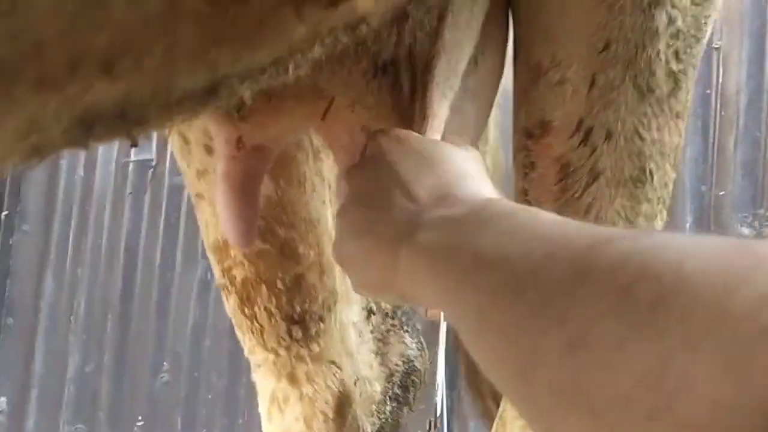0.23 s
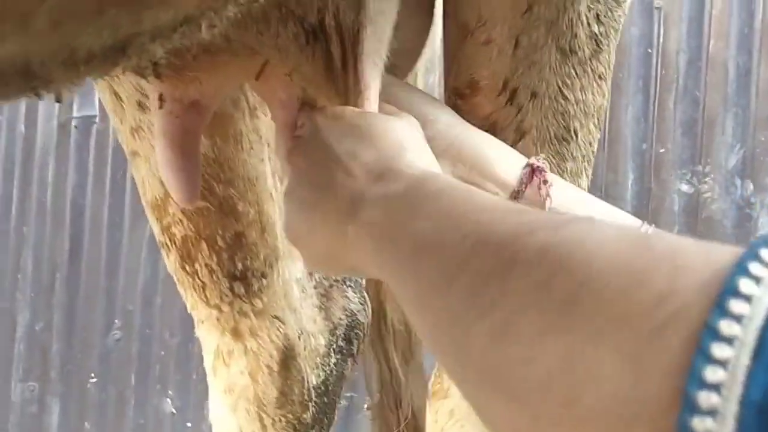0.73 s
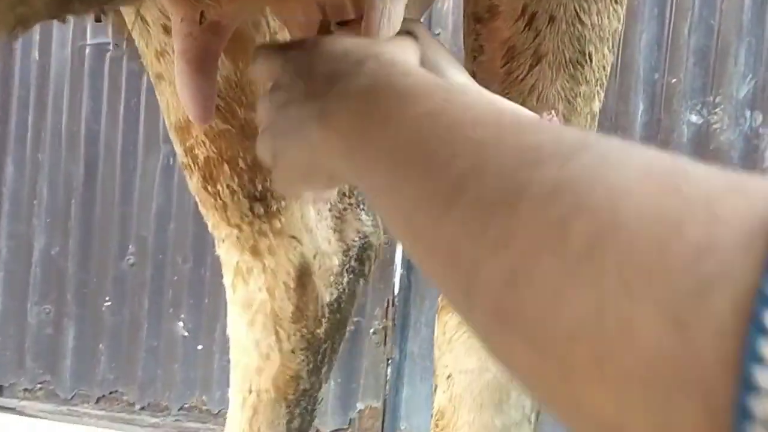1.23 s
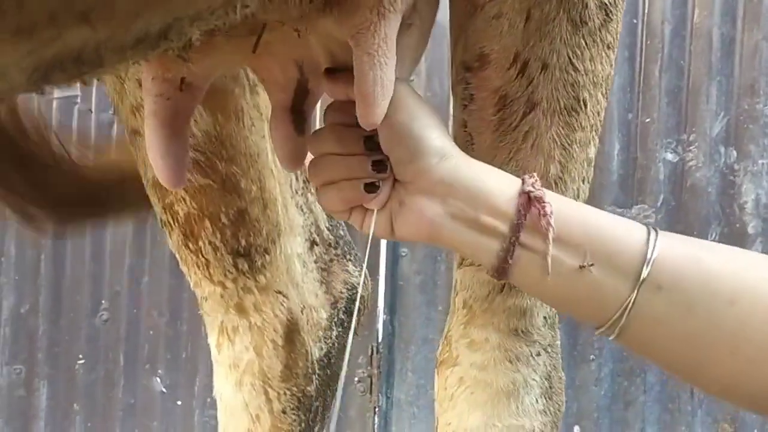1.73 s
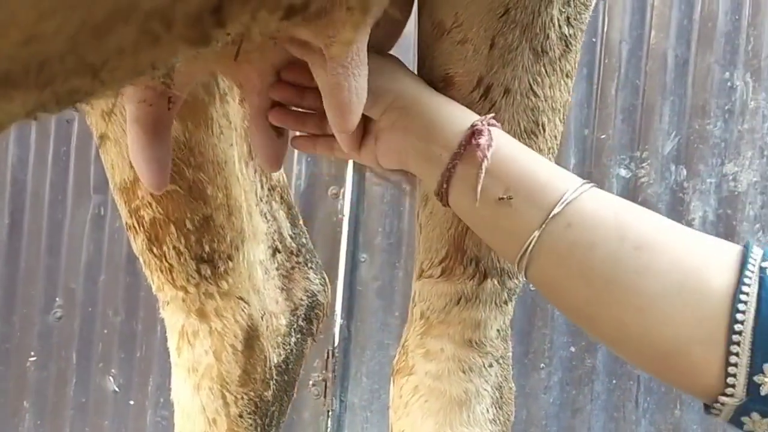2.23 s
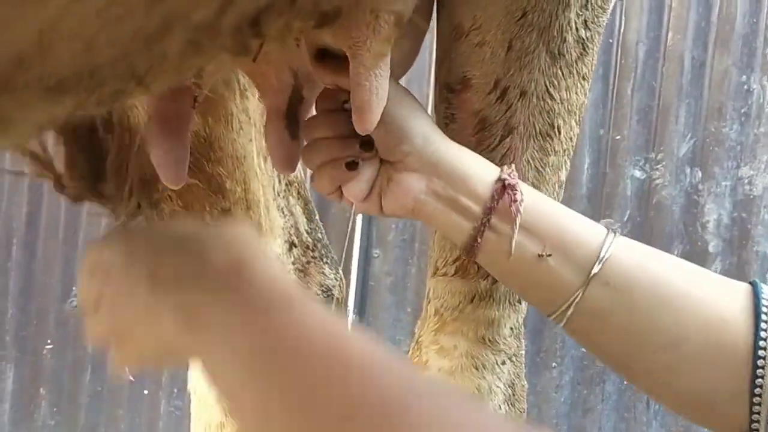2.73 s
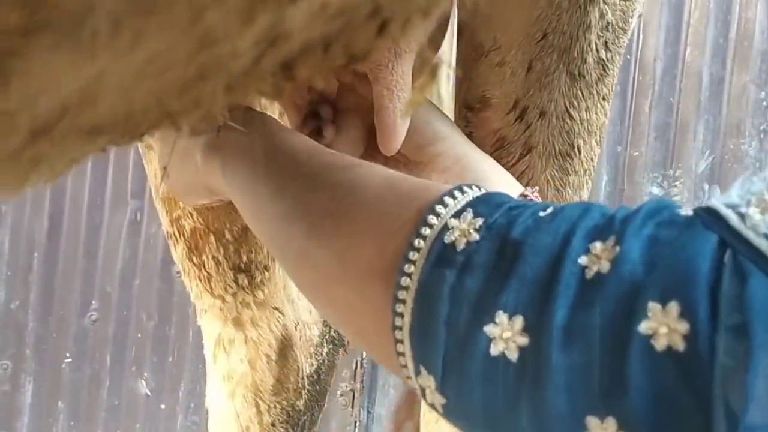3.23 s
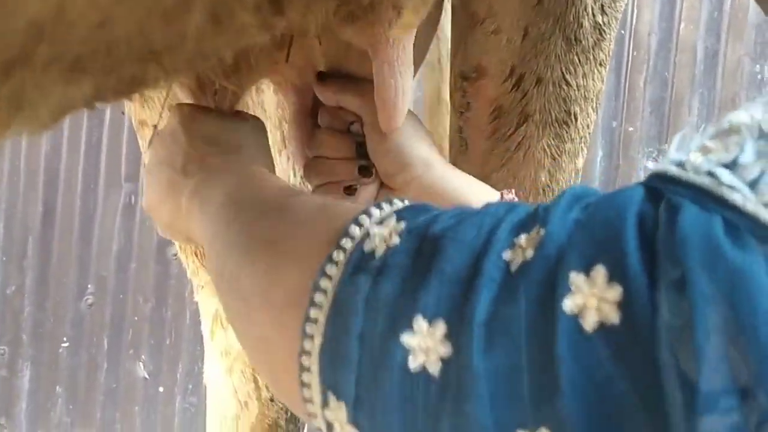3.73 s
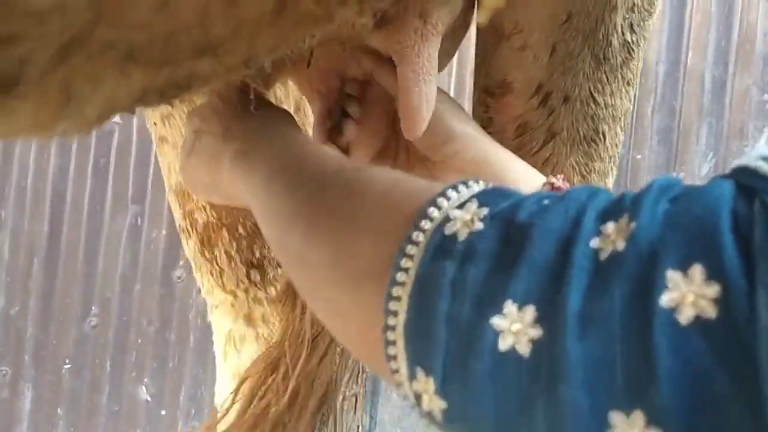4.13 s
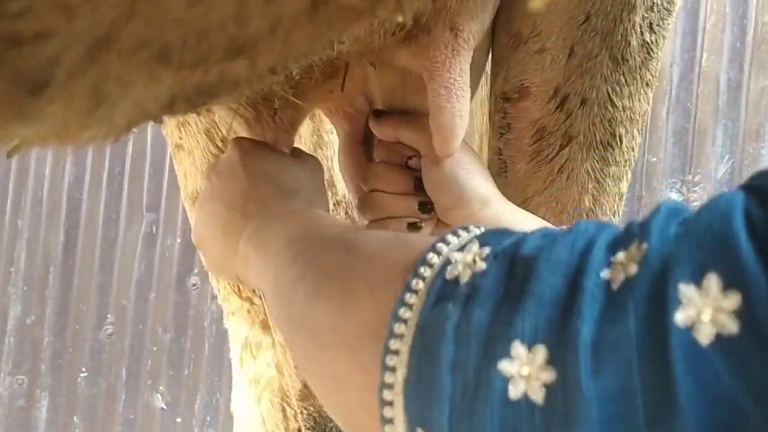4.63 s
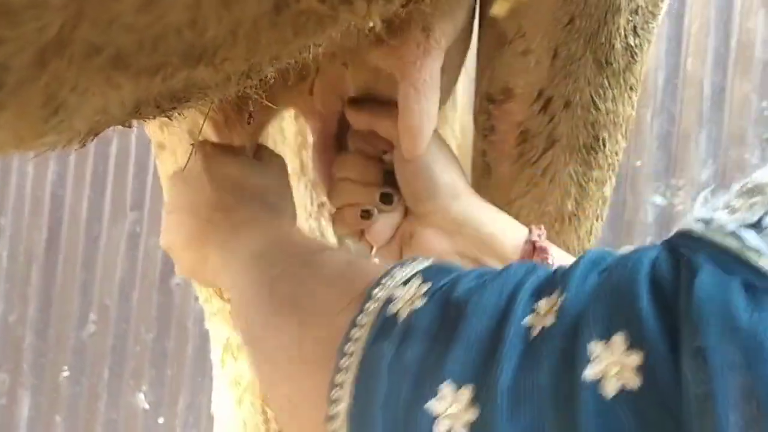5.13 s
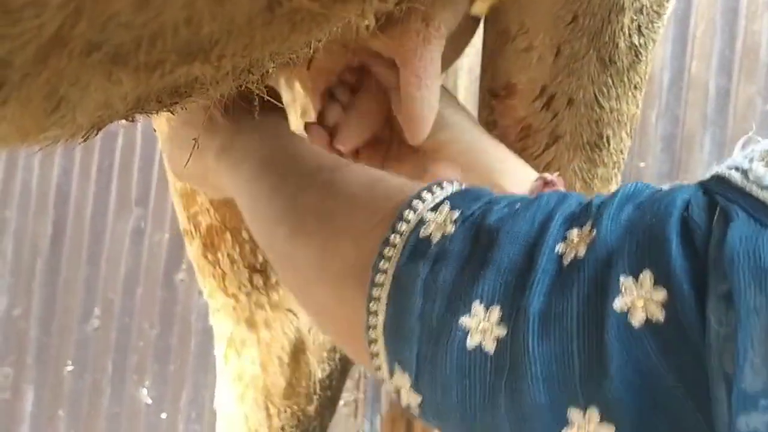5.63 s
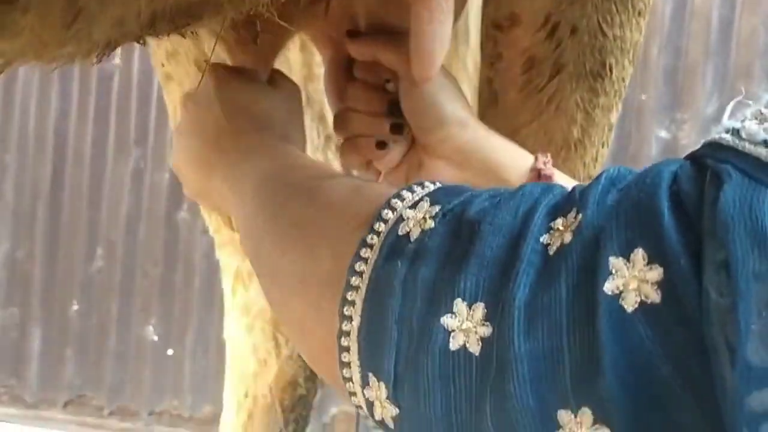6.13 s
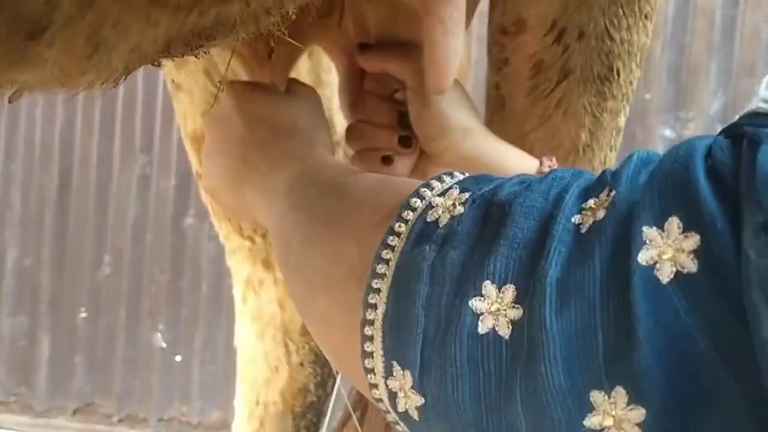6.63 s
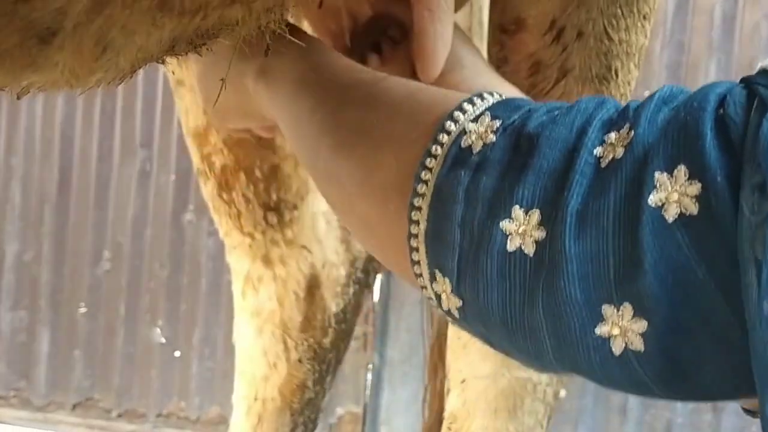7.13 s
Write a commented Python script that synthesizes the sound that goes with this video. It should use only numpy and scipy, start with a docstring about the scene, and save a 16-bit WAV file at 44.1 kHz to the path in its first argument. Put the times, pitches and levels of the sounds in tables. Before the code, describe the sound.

Hand milking heard very near in a small tin-walled shed: fizzing spray, pattering drops and plopping bubbles in each spurt. Rustling cloth and tiny high bangle tinks accompany the first jets. A hard, ringing squirt comes just before the middle, then a grip change and dull ground thuds. Slower, rounder spurts with hollow gulps follow, over faint still air and low rumble, ending on a very weak trickle of spray.

```python
"""Hand milking into a bucket.

A cow is milked by hand, close by, in a quiet tin-walled shed. Each squeeze sends a jet into frothy milk:
random drop impacts and bubbles patter, fizzing noise makes the spray, low resonances make the hollow gulp.
Filtered noise makes the rustle of hands and sleeves, the spits, the thuds on the ground and the still air.
Beating sine pairs make thin bangles tink."""
import sys
import numpy as np
from scipy import signal
from scipy.fft import rfft, irfft
from scipy.io import wavfile
from scipy.ndimage import uniform_filter1d

SR = 44100
rng = np.random.default_rng(int(sys.argv[2]) if len(sys.argv) > 2 else 0)


def pcm_store(signal):
    """Save signal as 16-bit PCM."""
    levels = np.round(np.clip(np.atleast_2d(signal), -1, 1) * 32767)
    wavfile.write(sys.argv[1], SR, levels.astype(np.int16).T)


N = 326340
TIME = np.arange(N) / SR
AGE = np.arange(SR // 4) / SR  # time within one event [s]

# splash and spray colours per kind of jet: (frequency [Hz], level [dB])
BRIGHT_SPLASH = [(280, -59), (480, -5), (752, -15.5), (859, -15.5), (1090, -1), (1200, -26), (1280, -6),
                 (2070, 5.5), (2860, -2.5), (3070, -5), (3580, -5), (4090, -14), (5500, -11), (7150, -85),
                 (12100, -120)]
BRIGHT_SPRAY = [(2240, -37), (3800, -8), (5690, -14), (7820, -2), (9770, -5), (12400, 3.5), (14900, 0),
                (16000, -37)]
HARD_SPLASH = [(280, -44), (480, -31), (565, -16), (613, -34), (894, -11.5), (971, -9), (1090, 4.5),
               (1210, -8), (1850, -2), (2070, -2.5), (2640, 0), (3510, -21.5), (3810, -4.5), (4130, -48),
               (5500, -46), (7150, -66), (12100, -120)]
HARD_SPRAY = [(2470, -27), (4200, -9), (5650, -12.5), (5940, -9), (6350, -4), (6610, -15), (7860, 0.5),
              (9350, -14), (13200, -4.5), (15000, -7), (16000, -21)]
DEEP_SPLASH = [(480, 10.5), (560, -12), (690, -7), (810, -10.5), (1020, -1.5), (1360, -7), (1550, -16),
               (1850, -8.5), (2700, -9.5), (3450, -3.5), (3950, -10), (5500, -19.5)]
DEEP_SPRAY = [(2240, -37), (3800, -18), (5230, -18), (6930, -4), (9540, -7), (13800, 4), (16000, 0)]
FULL_SPLASH = [(480, -2), (560, -10.5), (780, -8), (1020, 3.5), (1200, -3.5), (1400, -3.5), (1900, -3.5),
               (2550, -1), (3400, 4.5), (3900, -3.5), (4400, -32), (5500, -9.5)]
FULL_SPRAY = [(2470, -5), (4200, -3.5), (4890, -18), (6720, -1), (8740, -11), (10200, -6), (12000, 0),
              (15000, -5), (16000, 5)]
THIN_SPLASH = [(410, -40), (700, -14), (1150, -6), (2190, -8), (2590, -1), (4800, -10), (6830, -6),
               (9600, -25), (14000, -17), (16000, -31)]
# squeezes: (start [s], build-up [s], length [s], splash [dB], gulp [dB], spray [dB], kind of jet)
SQUIRTS = [ (0.198, 0.036, 0.22, -41.5, -47.5, -43.5, "bright"),
           (0.842, 0.025, 0.039, -46.5, -65, -42, "bright"),
           (1.008, 0.03, 0.17, -41.5, -45.5, -43.5, "bright"),
           (1.553, 0.17, 0.22, -38.5, -48.5, -42.5, "bright"),
           (2.307, 0.043, 0.088, -41.5, -72, -46, "bright"), (2.605, 0.11, 0.4, -29.5, -41, -45.5, "hard"),
           (3.398, 0.023, 0.072, -55, -61, -47, "bright"), (4.35, 0.085, 0.32, -39.5, -45, -48.5, "deep"),
           (5.064, 0.11, 0.31, -44.5, -45, -49, "full"), (5.781, 0.12, 0.305, -43.5, -51, -50, "full"),
           (6.437, 0.065, 0.36, -42, -45, -49, "full"), (7.189, 0.078, 0.3, -56, -69, -66.5, "thin"), ]
DRUM_HZ = 105  # lowest mode of the bucket's bottom


def squirts():
    """All squeezes; the hard jet also drums the bottom of the bucket."""
    milk = liquid()
    bright = jet(milk, "bright", BRIGHT_SPLASH, BRIGHT_SPRAY, bubbles_db=-7, ring_db=-26)
    hard = jet(milk, "hard", HARD_SPLASH, HARD_SPRAY, bubbles_db=-10, ring_db=-1)
    deep = jet(milk, "deep", DEEP_SPLASH, DEEP_SPRAY, bubbles_db=-5.5, ring_db=2.5)
    full = jet(milk, "full", FULL_SPLASH, FULL_SPRAY, bubbles_db=-12.5, ring_db=-10)
    thin = jet(milk, "thin", THIN_SPLASH, FULL_SPRAY, bubbles_db=-13, ring_db=-21)

    hits = drops(rate=400, spread_db=3)
    drum = even(resonate(resonate(hits, DRUM_HZ, 22), DRUM_HZ, 45), span_s=0.06)
    drumming = np.zeros(N)
    for start, build, length, _, gulp_db, _, kind in SQUIRTS:
        if kind == "hard":
            drumming += undb(gulp_db) * envelope(start, build, length, rise_db=14, sag_db_per_s=48, release=0.2)
    return bright + hard + deep + full + thin + undb(0.5) * drum * drumming


# air resonances of the bucket: (frequency [Hz], width [Hz], level [dB])
BUCKET = [(985, 33, 3.5), (1404, 81, 11), (1660, 110, 9), (1920, 120, 4), (3200, 250, -33)]


def jet(textures, kind, splash_colour, spray_colour, bubbles_db, ring_db):
    """Drops patter, ring the bucket, shake the hollow and throw spray; all but the hard jet sputter."""
    patter, bubbles, gulp, mist = textures
    splash_gain, gulp_gain, spray_gain = squeezes(kind)
    patter = patter + undb(bubbles_db) * bubbles
    ring = sum(undb(db) * resonate(patter, hz, width) for hz, width, db in BUCKET)
    splash = even(colour(patter + undb(ring_db) * ring, splash_colour), span_s=0.022)
    spray = even(colour(mist, spray_colour), span_s=0.03)
    strength = 1 if kind == "hard" else sputter()
    return strength * (splash_gain * splash + gulp_gain * gulp) + spray_gain * spray


# splash builds with the squeeze and sags as the teat empties
SPLASH_RISE_DB, SPLASH_SAG_DB_PER_S, SPLASH_RELEASE_S = 7.5, 14, 0.23
# the hollow reaches its level DIG_S after the splash, once the jet has dug it
DIG_S, GULP_RISE_DB, GULP_SAG_DB_PER_S, GULP_RELEASE_S = 0.04, 12, 8, 0.15
# spray flies as soon as the teat opens
SPRAY_ATTACK_S, SPRAY_SAG_DB_PER_S, SPRAY_RELEASE_S = 0.013, 2.5, 0.16


def squeezes(kind):
    """Gain curves of splash, hollow and spray for all squeezes with one kind of jet."""
    splash, gulp, spray = np.zeros((3, N))
    for start, build, length, splash_db, gulp_db, spray_db, row_kind in SQUIRTS:
        if row_kind != kind:
            continue
        splash += undb(splash_db) * envelope(start, build, length, SPLASH_RISE_DB,
                                             SPLASH_SAG_DB_PER_S, SPLASH_RELEASE_S)
        gulp += undb(gulp_db) * envelope(start, build + DIG_S, length, GULP_RISE_DB,
                                         GULP_SAG_DB_PER_S, GULP_RELEASE_S)
        spray += undb(spray_db) * envelope(start, SPRAY_ATTACK_S, length, 0,
                                           SPRAY_SAG_DB_PER_S, SPRAY_RELEASE_S)
    return splash, gulp, spray


SPUTTER_PER_S, SPUTTER_DB = 26, 2.6  # random steps per second; spread of the steps


def sputter():
    """Gain of a jet whose strength wavers at random; mean power 1."""
    size = int(SR / SPUTTER_PER_S)
    steps = np.repeat(rng.standard_normal(N // size + 1), size)
    return unit(undb(SPUTTER_DB * uniform_filter1d(steps, size // 2)[:N]))


# air resonances of the dug hollow: (frequency [Hz], width [Hz], level [dB])
HOLLOW = [(308, 24, -3), (364, 36, 3), (423, 90, -22)]


def liquid():
    """Raw textures of a jet hitting milk: patter of drops, bubbles, gulping hollow, fizzing mist."""
    impacts = unit(drops(rate=900, spread_db=3.2))
    patter = flicker(unit(impacts + scatter(impacts, t60=0.037)), rate=80, depth_db=5)
    # the sides of the bucket throw the drops back
    patter = walls(patter, t60=0.04, wet_db=-8)
    bubbles = froth(low_hz=649.4, high_hz=4030, cycles=32, spread_db=2, count=2600)

    surges = drops(rate=220, spread_db=4)
    hollow = sum(undb(db) * resonate(surges, hz, width) for hz, width, db in HOLLOW)
    gulp = resonate(hollow, hz=390, width=600)

    fizz = froth(low_hz=4500, high_hz=15500, cycles=70, spread_db=4, count=8000)
    fine = fizz + 0.7 * scatter(impacts, t60=0.012) + 0.7 * impacts
    mist = flicker(fine, rate=60, depth_db=3.5, count=24)
    return unit(patter), bubbles, even(gulp, span_s=0.032), even(mist, span_s=0.091)


# biggest drops: (time [s], level before trim [dB], pitch [Hz], ring t60 before scaling [s],
# splatter relative to ring before scaling [dB])
SPLATS = [(0.211, -24, 2290, 0.063, -19), (0.221, -24, 2066, 0.084, 2), (0.256, -19.5, 1955, 0.051, -8),
          (0.304, -22.5, 1040, 0.037, -11), (0.501, -9, 3930, 0.01, -15), (0.551, -25, 1690, 0.036, -12),
          (0.577, -31, 1350, 0.04, -13), (0.604, -28, 2200, 0.025, -7), (1.018, -30, 1690, 0.027, 4.5),
          (1.075, -13.5, 2255, 0.03, -12.5), (1.094, -16, 2740, 0.02, -26), (1.11, -15, 1966, 0.026, -22),
          (1.134, -19.5, 2674, 0.034, 1), (1.726, -31, 2060, 0.033, -2), (2.158, -40.5, 3200, 0.0083, 0),
          (2.294, -33, 1700, 0.04, -3), (2.403, -23, 1800, 0.058, -3), (2.688, -17, 1428, 0.08, -22),
          (2.941, -25, 1700, 0.052, -13), (3.023, -14, 1822, 0.12, -1), (3.2, -40.5, 3250, 0.025, 1.5),
          (3.662, -26, 2280, 0.022, -12), (4.421, -24.5, 685, 0.026, -14), (4.438, -25, 692, 0.066, -10),
          (4.574, -30, 3360, 0.031, -4), (4.622, -29, 1800, 0.05, -7), (4.649, -23, 3410, 0.042, -22),
          (4.667, -25, 3360, 0.028, -11), (5.175, -22.5, 2660, 0.032, -1.5), (5.239, -23.5, 1945, 0.035, 2),
          (5.26, -26, 1029, 0.11, -3), (5.861, -20.5, 3080, 0.032, -3), (5.884, -26, 1040, 0.035, -5),
          (5.977, -27, 980, 0.057, -4.5), (6.481, -26, 1020, 0.1, 1), (6.5, -29, 2580, 0.025, 5.5),
          (6.598, -29.5, 1880, 0.045, 1), (6.934, -41.5, 2930, 0.062, -2.5)]


def splats():
    """A big drop cracks the surface, rings a bubble and scatters splatter around the same pitch."""
    out = np.zeros(N)
    onset = 1 - np.exp(-AGE / 0.00077)
    for s, db, hz, t60, splatter_db in SPLATS + small_drops():
        burst = rng.standard_normal(len(AGE)) * (fade(0.06) + 1.2 * fade(0.0079))
        # the foam swallows the top of the splatter
        splatter = colour(resonate(burst, hz, 0.51 * hz), [(750, -5), (3700, -2.5), (4700, -12.5), (7000, -11)])
        splatter *= 2.12 / np.abs(splatter).max()
        ring = bubble(hz, 0.99 * t60, rise=0.067)
        add(out, s, undb(db - 5.5) * (ring + undb(splatter_db) * splatter) * onset)
    return out


# level over the splash, before the trim in splats(); median pitch
DROP_DB, DROP_SPREAD_DB = 8, 2.5
DROP_HZ, DROP_SPREAD_OCTAVES, DROP_T60_S, DROP_SPLATTER_DB = 1800, 0.55, 0.033, -6


def small_drops(count=5):
    """Lesser drops fall at random once a squirt has built up, louder where its splash is louder."""
    rows = []
    for start, build, length, splash_db, *_ in SQUIRTS:
        shares = rng.random(count)
        sizes, pitches = rng.standard_normal((2, count))
        for share, size, pitch in zip(shares, sizes, pitches):
            when = start + build + (length - build) * share
            level_db = splash_db + DROP_DB + DROP_SPREAD_DB * size
            hz = DROP_HZ * 2 ** (DROP_SPREAD_OCTAVES * pitch)
            rows.append((when, level_db, hz, DROP_T60_S, DROP_SPLATTER_DB))
    return rows


# loudest collapses of the hollow: (time [s], level before trim [dB], pitch [Hz])
GULPS = [(0.392, -37, 342), (1.091, -31, 357), (1.882, -42.5, 402), (3.113, -37.5, 364), (4.557, -30, 400),
         (5.288, -37.5, 393), (6.059, -32.5, 375), (6.625, -32.5, 373), (6.683, -32, 353)]


def gulps():
    """Large air pockets swell and ring low, climbing slightly in pitch."""
    out = np.zeros(N)
    onset = 1 - np.exp(-AGE / 0.0022)
    for s, db, hz in GULPS + collapses():
        add(out, s, undb(db + 5.5) * bubble(hz, t60=0.063, rise=0.073) * onset)
    return out


# level over the hollow, before the trim in gulps(); median pitch
COLLAPSE_DB, COLLAPSE_SPREAD_DB, COLLAPSE_HZ, COLLAPSE_SPREAD_OCTAVES = 3, 5, 373, 0.099


def collapses(count=5):
    """The dug hollow caves in a few times, unevenly spaced, until the squeeze ends."""
    rows = []
    for start, build, length, _, gulp_db, _, _ in SQUIRTS:
        share = (np.arange(count) + rng.random(count)) / count
        size, pitch = rng.standard_normal((2, count))
        dug = min(build + DIG_S, length / 2)
        when = start + dug + share * (length - dug)
        level_db = gulp_db + COLLAPSE_DB + COLLAPSE_SPREAD_DB * size
        rows += zip(when, level_db, COLLAPSE_HZ * 2 ** (COLLAPSE_SPREAD_OCTAVES * pitch))
    return rows


# air spits: (time [s], level before trim [dB])
SPITS = [(0.1022, -22), (0.437, -23), (0.8613, -21), (1.04, -19.5), (1.0932, -12.5), (1.56, -18.5),
         (1.6474, -23.5), (1.685, -32), (2.3516, -23.5), (2.463, -33), (2.94, -23.5), (3.025, -25),
         (3.0592, -24.5), (3.199, -41), (3.6092, -33), (4.0856, -22.5), (4.39, -28.5), (4.419, -26),
         (4.7447, -40), (5.1153, -27.5), (6.557, -28), (7.1666, -43.5)]
SPIT_T60_S = 0.036


def spits():
    """Air spits out with the milk: short bright noise bursts with a fast and a slower decay."""
    out = np.zeros(N)
    for s, db in SPITS:
        burst = unit(colour(rng.standard_normal(len(AGE)), BRIGHT_SPRAY))
        add(out, s, undb(db - 15) * burst * (fade(SPIT_T60_S) + 1.8 * fade(0.0084)))
    return out


# bangles touch: (time [s], level before trim [dB], pitch [Hz], t60 [s])
TINKS = [(0.3313, -21.5, 13310, 0.16), (.569, -35.5, 13300, 0.12), (0.604, -33.5, 13400, 0.026),
         (.904, -37, 13000, 0.056), (2.21, -47, 12060, 0.14), (2.254, -51, 13000, 0.17),
         (3.648, -41, 12100, 0.069), (3.664, -50, 13880, 0.18), (4.044, -44.5, 11800, 0.27)]


def bangles():
    """Thin metal rings: a noisy click with a close pair of beating modes."""
    out = np.zeros(N)
    for s, db, hz, t60 in TINKS:
        modes = np.sin(2 * np.pi * hz * AGE) + 0.19 * np.sin(2 * np.pi * (hz + 270) * AGE)
        click = unit(resonate(rng.standard_normal(len(AGE)), hz, 1500)) * fade(0.069)
        add(out, s, undb(db - 0.5) * (modes * fade(t60) + 0.5 * click))
    return out


# dull thuds: (time [s], peak before trim [dB], t60 [s])
THUDS = [(3.457, -25.5, 0.14), (3.475, -18, 0.058), (3.486, -25, 0.094), (3.522, -28.5, 0.052),
         (3.545, -36, 0.053), (3.758, -39, 0.07)]
# thud colour: (frequency [Hz], level [dB])
THUD_COLOUR = [(29, -39), (50, -10.5), (427, 2.5), (768, -8), (940, -1), (1460, -18), (1720, -5),
               (1960, -13), (2620, -16), (4000, -37), (5200, -69), (8800, -120)]


def thuds():
    """A soft heavy blow on the ground: a short push with a gritty noise tail."""
    out = np.zeros(N)
    for s, db, t60 in THUDS:
        push = fade(0.0006) + 0.95 * rng.standard_normal(len(AGE)) * fade(t60)
        blow = colour(push, THUD_COLOUR)
        add(out, s, undb(db - 1) * blow / np.abs(blow).max())
    return out


# colours of rubbing, rustle and crackle: (frequency [Hz], level [dB])
RUB_COLOUR = [(130, -45.5), (220, 0.5), (339, 12.5), (488, 1.5), (1010, 0.5), (1120, -7.5), (1400, 6.5),
              (1820, -32.5), (3080, -120)]
RUSTLE_COLOUR = [(900, -2.5), (1400, 5.5), (2200, 5), (2800, -1.5), (3600, -11), (5200, -13.5)]
CRACKLE_COLOUR = [(4200, -17), (6400, -4), (7900, 2.5), (9500, -3.5), (12500, 1.5), (15600, -2)]
# sleeve noise with the hands at rest: (time [s], rustle level [dB], crackle level [dB])
SLEEVES = [(0, -52.5, -53.5), (1.35, -54, -58), (1.45, -58, -61.5), (1.6, -54.5, -61.5), (2.6, -54.5, -59),
           (3.3, -57, -64.5), (3.8, -59, -64), (4.27, -57, -61.5), (4.33, -56, -58.5), (4.7, -62.5, -65),
           (4.79, -57, -77), (5.0, -68, -74), (5.5, -74, -87), (6.2, -68.5, -74), (7.0, -71, -87)]
SLEEVE_FOLLOW = 0.46  # dB of sleeve noise per dB of rubbing
# feet and knees shift: (start [s], length [s], level [dB])
BUMPS = [(1.41, 0.044, -49.5), (2.436, 0.23, -69), (4.15, 0.58, -64.5), (5.457, 0.072, -63)]
# low rumble: (time [s], level [dB])
RUMBLE = [(0, -60.5), (1.15, -57), (2.0, -53), (2.35, -61.5), (3.4, -61.5), (3.6, -58), (4.0, -66),
          (4.65, -53.5), (5.2, -70), (7.4, -75)]


def handling():
    """Skin and cloth slide in tiny slips while the foam settles; feet and knees shuffle below."""
    stir = stirring()
    rustle_gain, crackle_gain = gains(SLEEVES) * (stir / undb(IDLE_RUB_DB)) ** SLEEVE_FOLLOW
    slips = scatter(drops(rate=1000, spread_db=4), t60=0.035)
    foam = slips + undb(-12) * froth(low_hz=501.6, high_hz=3363, cycles=24, spread_db=4, count=1100)
    rub = stir * even(colour(foam, RUB_COLOUR), span_s=0.05)
    rustle = rustle_gain * even(colour(foam, RUSTLE_COLOUR), span_s=0.051)
    crackle = crackle_gain * even(colour(slips, CRACKLE_COLOUR), span_s=0.082)

    bump_gain = undb(-10) * stir
    for start, length, db in BUMPS:
        bump_gain += undb(db) * envelope(start, 0.03, length, rise_db=1, sag_db_per_s=0, release=0.35)
    low_noise = colour(rng.standard_normal(N), [(80, -4), (120, 5.5), (160, -1.5), (240, -4.5)])
    bump = bump_gain * even(low_noise, span_s=0.045)
    deep_noise = colour(rng.standard_normal(N), [(20, -1.5), (38, -3), (80, -19)])
    rumble = gains(RUMBLE)[0] * even(deep_noise, span_s=0.28)
    return rub + rustle + crackle + bump + rumble


# a hand shifts its grip: (start [s], length [s], rubbing level [dB])
GRIPS = [(0.076, 0.11, -58), (0.746, 0.093, -64), (1.228, 0.13, -54.5), (2.445, 0.14, -49.5),
         (3.504, 0.12, -52), (3.779, 0.13, -59.5), (4.188, 0.3, -59), (5.623, 0.077, -55.5)]
GRIP_ATTACK_S, GRIP_RELEASE_S = 0.036, 0.14
IDLE_RUB_DB = -67
SETTLE_DB, SETTLE_T60_S = -17.5, 1.2  # settling foam, level relative to the splash


def stirring():
    """Gain of the rubbing: steady trace, swell at each grip, foam slowly settling after each squirt."""
    grips = [undb(db) * envelope(start, GRIP_ATTACK_S, length, 0, 0, GRIP_RELEASE_S)
             for start, length, db in GRIPS]
    settling = [undb(db + SETTLE_DB) * envelope(start, build, length, SPLASH_RISE_DB, 0, SETTLE_T60_S)
                for start, build, length, db, *_ in SQUIRTS]
    return np.sqrt(undb(IDLE_RUB_DB) ** 2 + sum(gain ** 2 for gain in grips + settling))


# soft narrow hiss: (start [s], length [s], level [dB])
HISS = [(1.758, 0.13, -47.5), (3.052, 0.45, -46.5), (4.675, 0.15, -54), (6.07, 0.11, -54.5)]
# still outdoor air: (frequency [Hz], level [dB])
YARD = [(15, -5), (25, 9.5), (92, -12), (153, 0), (217, -3.5), (451, -2.5), (641, -8.5), (1290, -10),
        (1700, -25), (3080, -11.5), (4610, -28), (11900, -28), (14800, -42), (16000, -17)]
YARD_DB = -60.5


def background():
    """Still air, and a soft narrow hiss that comes and goes."""
    hiss_colour = [(1300, -4), (1470, -5.5), (1750, 0.5), (1900, -6), (2030, -27), (2300, -12.5)]
    hiss = unit(colour(rng.standard_normal(N), hiss_colour))
    swell = sum(undb(db) * envelope(start, 0.074, length, rise_db=4, sag_db_per_s=-1, release=0.75)
                for start, length, db in HISS)
    air = unit(colour(rng.standard_normal(N), YARD))
    return hiss * swell + undb(YARD_DB) * air


def drops(rate, spread_db):
    """Random impacts of uneven size, rate per second."""
    hits = rng.random(N) < rate / SR
    return hits * rng.choice([-1, 1], N) * undb(spread_db * rng.standard_normal(N))


def scatter(impacts, t60):
    """Every impact bursts into its own short random splash."""
    keep = np.exp(-2 * np.log(1000) / (max(t60, 1e-3) * SR))
    power = signal.lfilter([1], [1, -keep], impacts ** 2 + 1e-18)
    return unit(np.sqrt(power) * rng.standard_normal(N))


def bubble(hz, t60, rise):
    """A ringing air pocket whose pitch climbs as it nears the surface."""
    return np.sin(2 * np.pi * hz * (AGE + rise * AGE ** 2 / max(t60, 1e-3) / 2)) * fade(t60)


def froth(low_hz, high_hz, cycles, spread_db, count):
    """Small bubbles of all sizes, each falling 60 dB in the given cycles as its pitch climbs slightly."""
    out = np.zeros(N)
    for when, size, loud in rng.random((count, 3)):
        hz = low_hz * (high_hz / low_hz) ** size
        turns = hz * AGE[:int(cycles / hz * SR) + 2]
        decay = np.exp(-np.log(1000) * turns / cycles)
        ring = np.sin(2 * np.pi * turns * (1 + 0.071 * turns / cycles)) * decay
        i = int(when * (N - len(ring)))
        # many faint bubbles, few loud ones
        out[i:i + len(ring)] += ring * (loud + 0.01) ** (-spread_db * np.log(10) / 20)
    return unit(out)


def flicker(x, rate, depth_db, count=12):
    """Each band swells and sinks on its own as the liquid changes shape."""
    size = int(SR / rate)
    spectrum = rfft(x)
    place = np.linspace(0, 1, len(spectrum)) ** 0.5 * (count - 1)
    out = 0
    for k in range(count):
        steps = np.repeat(rng.standard_normal(N // size + 1), size)
        walk = uniform_filter1d(steps, size)[:N]
        band = irfft(spectrum * np.maximum(1 - np.abs(place - k), 0), N)
        out = out + band * undb(depth_db * walk)
    return out


def walls(x, t60, wet_db):
    """Direct sound plus dense reflections from near walls."""
    tail = rng.standard_normal(len(AGE)) * fade(t60)
    return x + undb(wet_db) * signal.fftconvolve(x, tail / np.linalg.norm(tail))[:N]


def envelope(start, attack, length, rise_db, sag_db_per_s, release):
    """Gain curve: opens, climbs by rise_db, sags, then also falls 60 dB in the release time."""
    out = np.zeros(N)
    span = slice(*np.searchsorted(TIME, [start, start + length + release]))
    age = TIME[span] - start
    db = -rise_db * np.maximum(1 - age / attack, 0) - sag_db_per_s * np.maximum(age - attack, 0)
    db = db - 60 * np.maximum(age - length, 0) / release
    out[span] = undb(db) * np.minimum(2 * age / attack, 1)
    return out


def even(x, span_s):
    """A steady flow: rms near 1 over each short span, while single drops still stand out."""
    size = int(span_s * SR) + 1
    power = uniform_filter1d(uniform_filter1d(x ** 2, size), size)
    return x / np.sqrt(power + 1e-4 * np.mean(x ** 2))


def colour(x, points):
    """Causal minimum-phase filter through (Hz, dB) points, falling steeply beyond its ends."""
    size = 4096
    hz, db = np.transpose(points)
    octave = np.log2(np.maximum(np.arange(size // 2 + 1) * SR / size, 1))
    outside = np.abs(octave - np.clip(octave, np.log2(hz[0]), np.log2(hz[-1])))
    curve_db = np.interp(octave, np.log2(hz), db) - np.minimum(40 * outside, 50)
    cepstrum = irfft(np.log(undb(curve_db)))
    # folding the cepstrum makes the filter causal
    cepstrum[1:size // 2] *= 2
    cepstrum[size // 2 + 1:] = 0
    return signal.fftconvolve(x, irfft(np.exp(rfft(cepstrum))))[:len(x)]


def resonate(x, hz, width):
    """Two-pole band-pass, gain 1 at the centre."""
    hz = min(hz, SR / 2 - 2000)
    return signal.lfilter(*signal.iirpeak(hz, hz / min(width, SR / 4), fs=SR), x)


def gains(table):
    """Gain curves from the dB columns of a table."""
    s, *columns = np.transpose(table)
    return np.array([undb(np.interp(TIME, s, c)) for c in columns])


def fade(t60):
    """Exponential decay of one event."""
    return np.exp(-np.log(1000) * AGE / max(t60, 1e-3))


def add(out, s, sound):
    """Mix a sound in at time s."""
    i = int(np.clip(s * SR, 0, N - 1))
    out[i:i + len(sound)] += sound[:N - i]


def undb(db):
    """Decibels to gain."""
    return 10 ** (np.asarray(db) / 20)


def unit(x):
    """Scale to rms 1."""
    return x / np.sqrt(np.mean(x ** 2))


def scene():
    """Milk, bangles and thuds, answered faintly by the tin walls; handling and background stay dry."""
    near = squirts() + splats() + gulps() + spits() + bangles() + thuds()
    shed = walls(near, t60=0.2, wet_db=-14)
    return (shed + handling() + background())[None]


TOP_HZ = 15600


def record(dry):
    """Steep elliptic low-pass at TOP_HZ."""
    return signal.sosfilt(signal.ellip(10, 0.2, 70, TOP_HZ, fs=SR, output="sos"), dry)


dry = scene()
out = record(dry)
pcm_store(out)
```